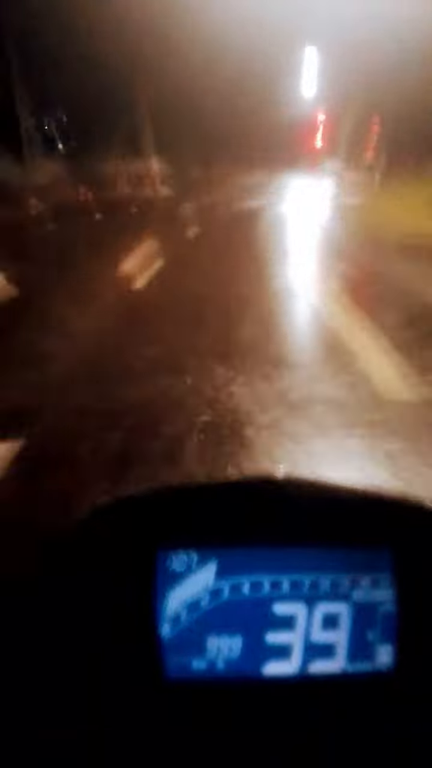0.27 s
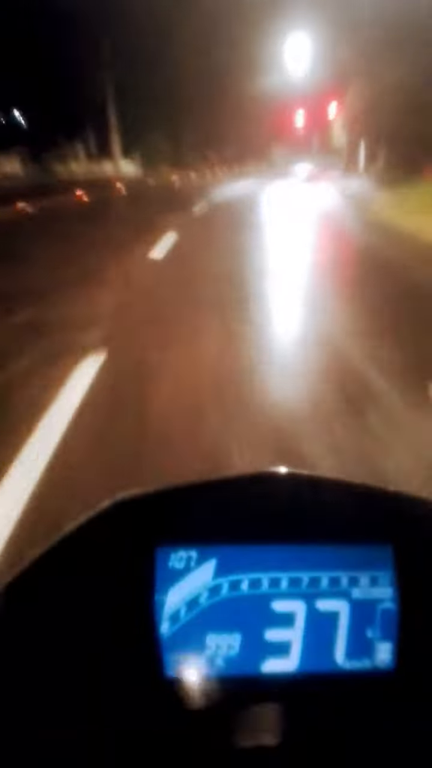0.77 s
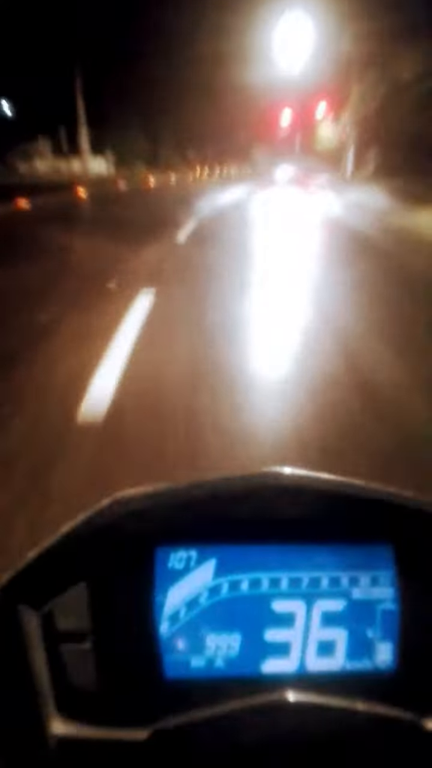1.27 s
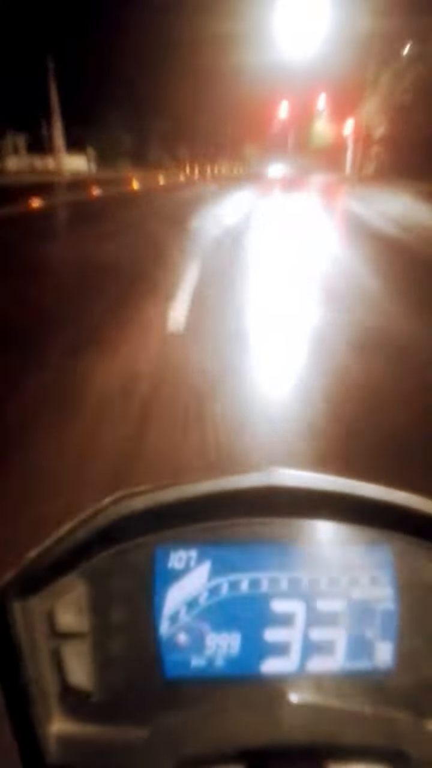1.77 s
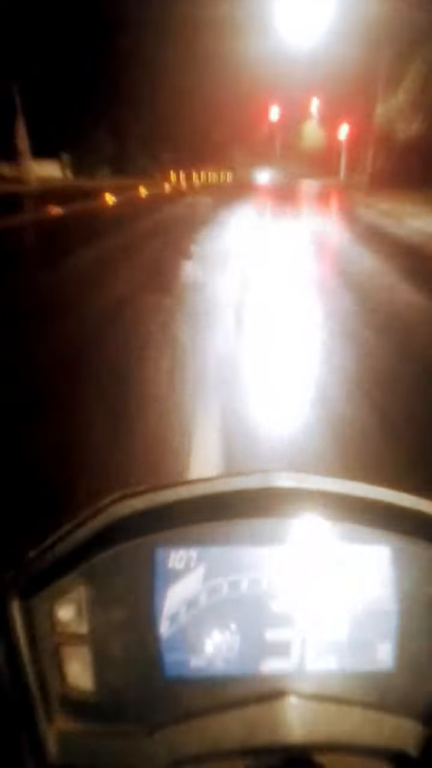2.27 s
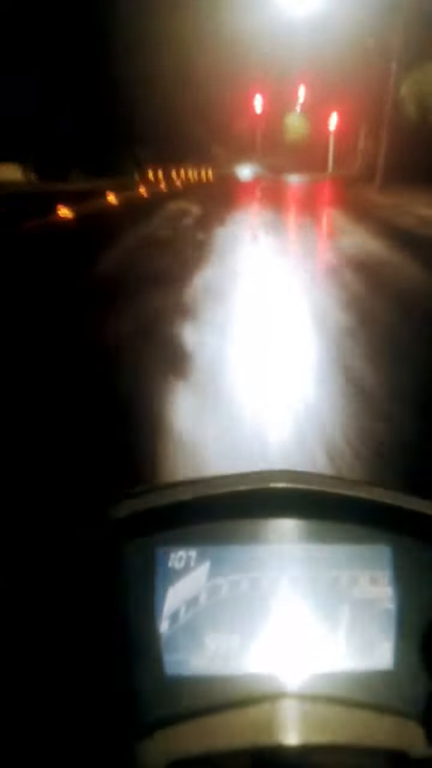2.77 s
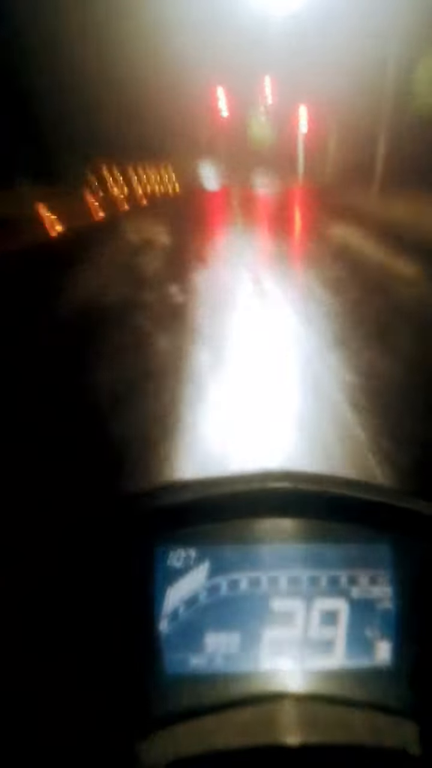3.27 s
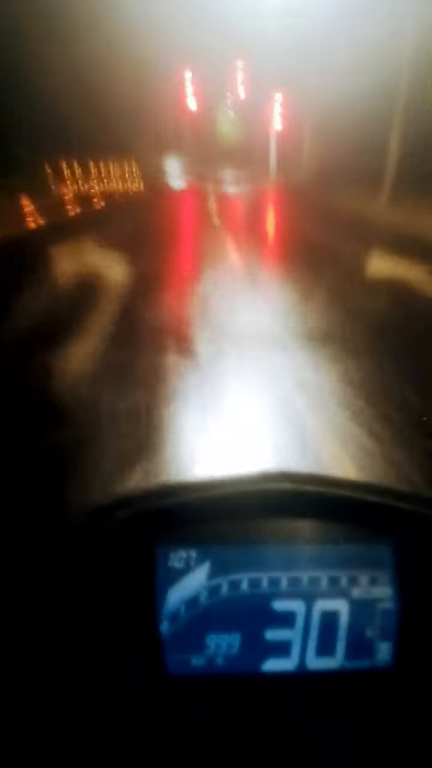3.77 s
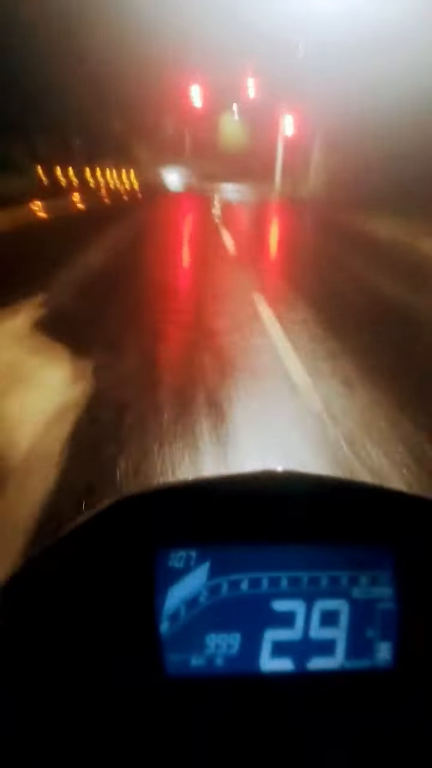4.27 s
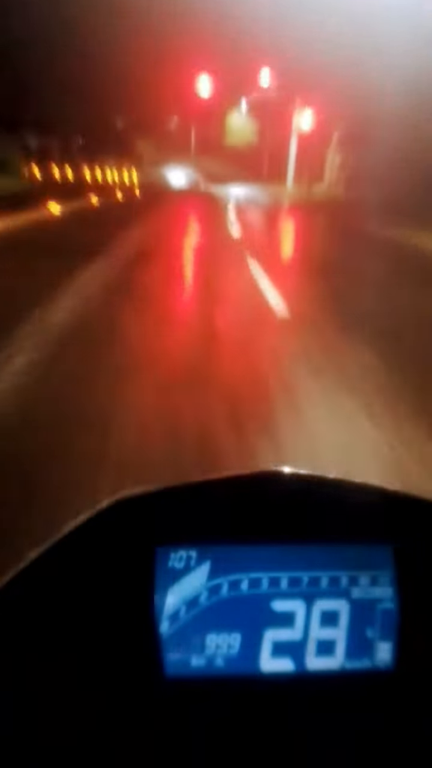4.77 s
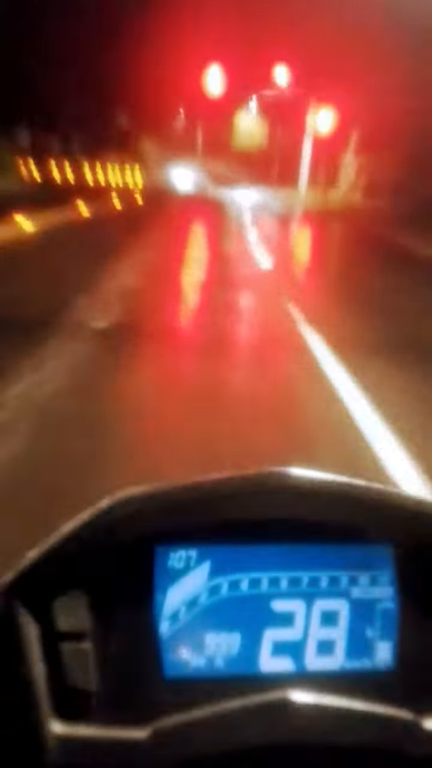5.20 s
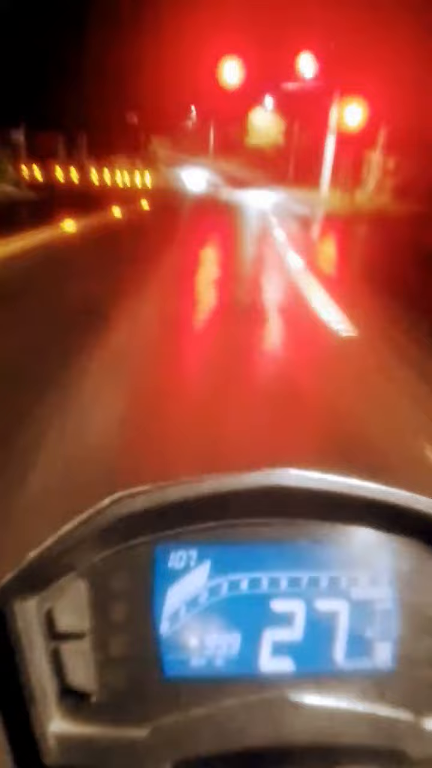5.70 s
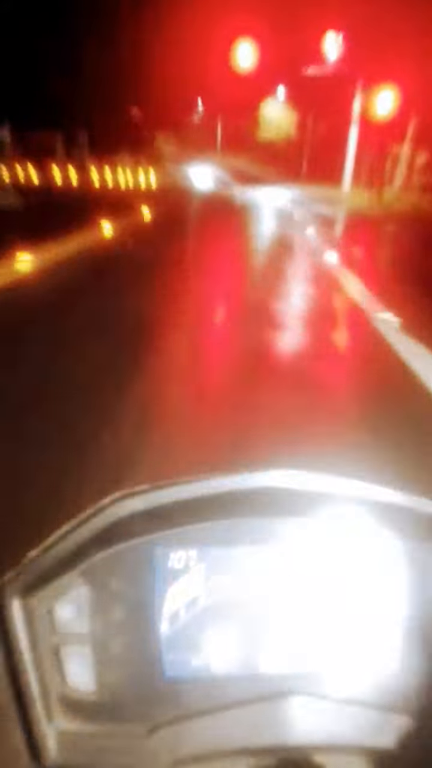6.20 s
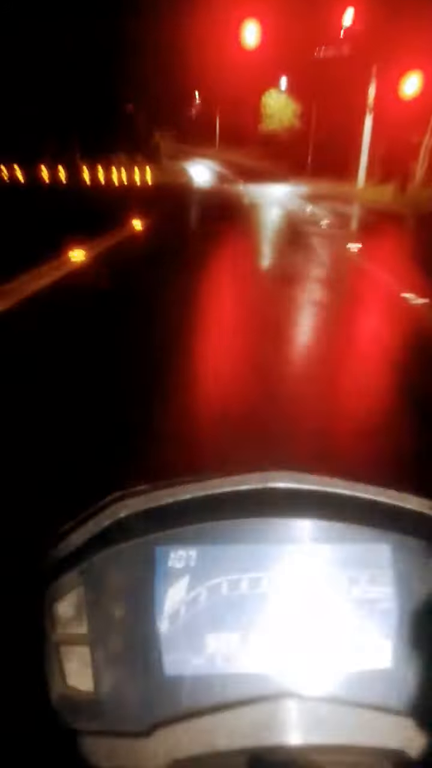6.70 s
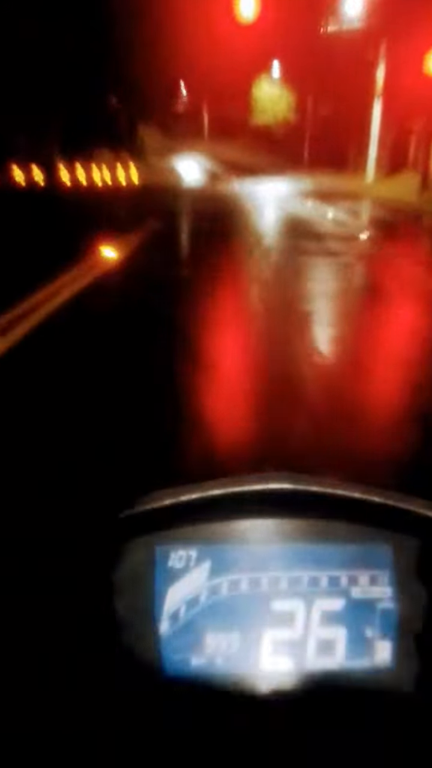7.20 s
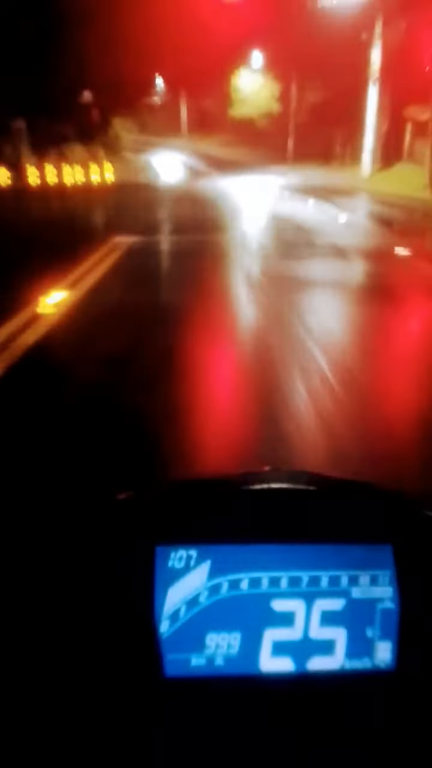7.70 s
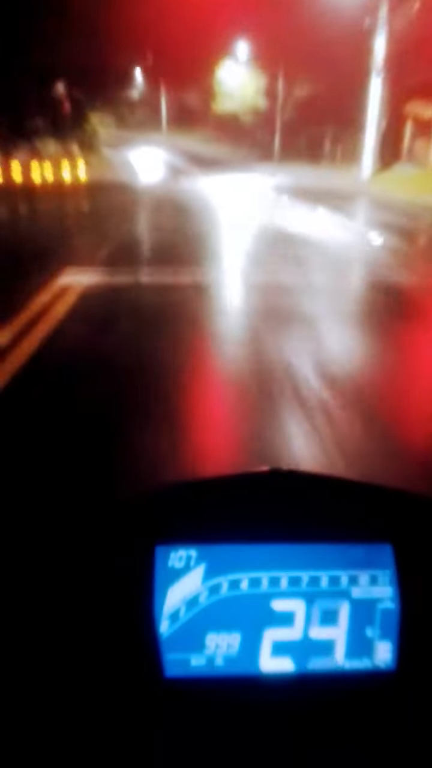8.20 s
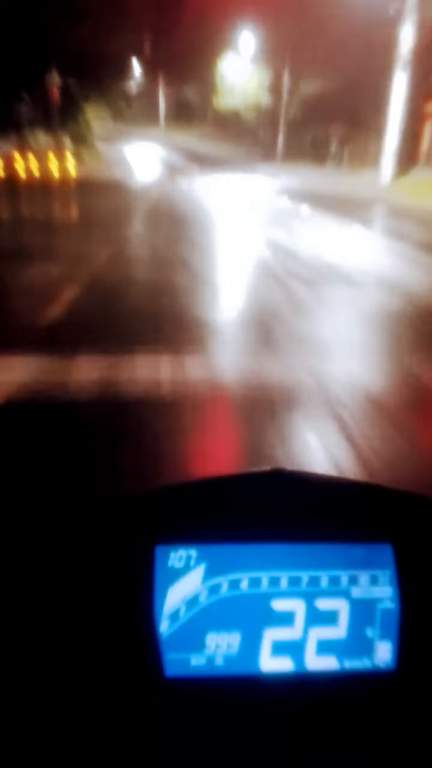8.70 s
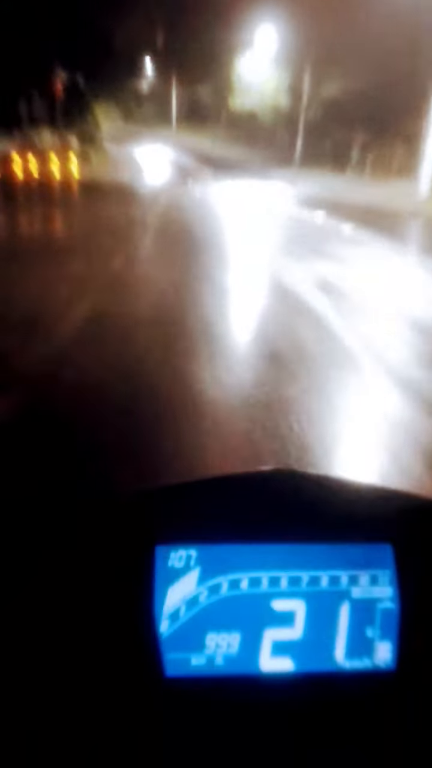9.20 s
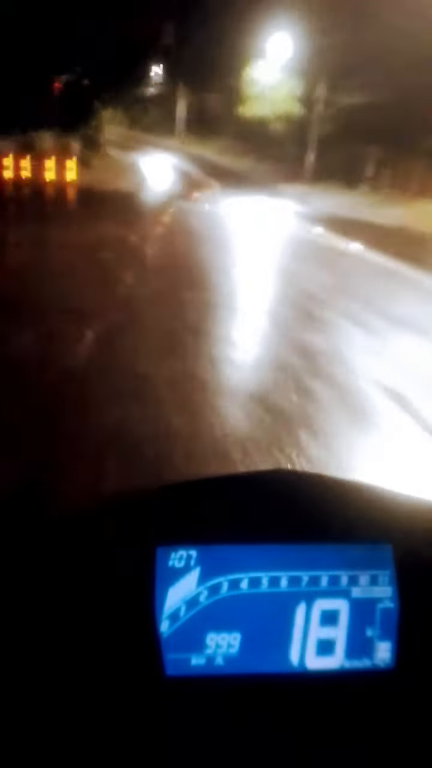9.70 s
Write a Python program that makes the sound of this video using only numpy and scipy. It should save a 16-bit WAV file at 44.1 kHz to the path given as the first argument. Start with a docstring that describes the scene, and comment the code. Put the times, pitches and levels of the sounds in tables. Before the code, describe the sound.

A small motorcycle coasts on a wet road, heard from on board. A fluttering roar of wind and tyres continues throughout, with irregular hollow knocks from bumps and thin ticking and buzzing from loose panels. Beneath it a low, wavering engine drone and a gear whine gradually fall in pitch. A brief hum and a faint rasp colour the first second or so, with a cluster of clicks at about 0.4 seconds. Around 2.4 seconds the engine dips for a downshift and returns higher by 2.7. It sinks again until about 6.4 seconds, when the clutch is pulled and engine and rattle drop away for half a second, then return at a higher pitch. The whine is strongest from 8 to 9.8 seconds, with a short break near 8.8. After 9.4 seconds the engine recedes and the rattles thin out, while the road noise carries on.

```python
"""On a wet road at night, a small motorcycle coasts down through two gear changes.
It is heard from on board, through a housing that rocks on its mount and modulates the sound.
Wind and road noise are filtered by the housing's resonances; bumps knock it, loose parts tick,
and its panels buzz in forced vibration. Meshing gears whine, and the crankshaft sounds its first
two harmonics. Engine, upper whine and roar sink whenever the clutch is pulled."""
import sys
import numpy as np
from scipy import signal
from scipy.fft import rfft, irfft, next_fast_len
from scipy.io import wavfile
from scipy.ndimage import uniform_filter1d

SR = 44100
rng = np.random.default_rng(int(sys.argv[2]) if len(sys.argv) > 2 else 0)


def wrap_up_sound(samples):
    """Save the sound to the file named by the first command line argument, as 16-bit audio."""
    columns = np.atleast_2d(samples).T
    # keep every value between -1 and 1, then stretch to whole-number steps
    tamed = np.clip(columns, -1, 1)
    steps = np.round(tamed * 32767).astype(np.int16)
    wavfile.write(sys.argv[1], SR, steps)


N = 438354
T = np.arange(N) / SR


def amp(db):
    """Amplitude ratio of a level in decibels."""
    return 10 ** (np.asarray(db) / 20)


def unit(x):
    """Normalisation to an rms of 1."""
    return x / np.sqrt(np.mean(x ** 2) + 1e-20)


def curves(rows):
    """Linear interpolation of each column of a table over time."""
    times, *columns = np.transpose(rows)
    return [np.interp(T, times, column) for column in columns]


def add(mix, start_s, sound):
    """Superposition of a short sound on the mix."""
    part = mix[round(start_s * SR):][:len(sound)]
    part += sound[:len(part)]


def wander(grain_s):
    """Random fluctuation: white noise smoothed by two moving averages."""
    size = max(round(grain_s * SR), 1)
    return unit(uniform_filter1d(uniform_filter1d(rng.standard_normal(N), size), size))


def ring(t, hz, rise_s):
    """Damped oscillation whose envelope peaks at rise_s."""
    return t / rise_s * np.exp(1 - t / rise_s) * np.sin(2 * np.pi * hz * t)


def resonate(x, hz, width_hz):
    """Resonance with steep skirts: a double pole at hz."""
    carrier = np.exp(2j * np.pi * np.cumsum(hz * np.ones(N)) / SR)
    r = np.exp(-np.pi * width_hz / SR)
    return 2 * (carrier * signal.lfilter([(1 - r) ** 2], [1, -2 * r, r * r], x / carrier)).real


def coloured(x, spectrum):
    """Minimum-phase filtering, so that blows ring only after they land; rms 1."""
    size = 2 * next_fast_len(N // 2 + 4096)
    hz, db = np.transpose(spectrum)
    bins_hz = np.fft.rfftfreq(size, 1 / SR)
    gain_db = np.interp(np.log(bins_hz + 1), np.log(hz + 1), db, left=-80, right=-80)
    cepstrum = irfft(gain_db * np.log(10) / 20, size)
    cepstrum[1:size // 2] *= 2  # fold onto positive time
    cepstrum[size // 2 + 1:] = 0
    return unit(irfft(rfft(x, size) * np.exp(rfft(cepstrum)), size)[:N])


# Strokes of the clutch lever: pull_s, release_s, depth_fraction
CLUTCH_STROKES = [(2.333, 2.547, 0.6), (6.398, 6.761, 0.95), (9.357, 10.2, 0.5)]
def clutch():
    """Decoupling of the drive, from 0 (engaged) to 1 (fully pulled)."""
    fade_s, grip_s = .22, .15
    return sum(depth * np.clip(np.minimum((T - pull) / fade_s, (release - T) / grip_s + 1), 0, 1)
               for pull, release, depth in CLUTCH_STROKES)


# Sway of the housing on its mount: time_s, rate_hz, relative_depth
MOUNT_SWAY = [(0.0, 19.23, 0.91), (0.28, 15.5, 0.55), (0.57, 16.68, 1.24), (0.85, 17.9, 0.98),
              (1.14, 16.97, 1.59), (1.42, 16.28, 0.83), (1.7, 17.53, 1.16), (1.99, 13.5, 0.9),
              (2.27, 17.74, 0.87), (2.56, 16.48, 0.73), (2.84, 17.36, 1.17), (3.12, 14.62, 1.32),
              (3.41, 18.73, 1.27), (3.69, 16.02, 1.47), (3.98, 16.81, 1.31), (4.26, 17.25, 1.09),
              (4.54, 19.36, 1.3), (4.83, 18.04, 0.89), (5.11, 13.53, 0.94), (5.4, 18.06, 1.43),
              (5.68, 18.55, 0.99), (5.96, 17.1, 1.33), (6.25, 17.67, 1.23), (6.53, 18.5, 0.81),
              (6.82, 16.87, 0.91), (7.1, 17.74, 1.31), (7.38, 16.37, 1.16), (7.67, 16.3, 0.47),
              (7.95, 18.98, 0.94), (8.24, 16.77, 0.94), (8.52, 16.94, 0.37), (8.8, 16.16, 0.94),
              (9.09, 17.12, 0.95), (9.37, 17.24, 0.55), (9.66, 15.25, 0.37), (9.94, 26.64, 0.32)]
def rocking():
    """Low-frequency oscillation of the mount, wandering in depth."""
    rate_hz, depth = curves(MOUNT_SWAY)
    cycles = np.cumsum(rate_hz) / SR - .082
    return (depth + .33 * wander(.19)) * np.cos(2 * np.pi * cycles)


def shaken(motion, rock_db, crank_db, jolt_db, flutter_db, grain_s):
    """Amplitude modulation of white noise by mount, crank, road jolts and chance."""
    rock, crank, jolts = motion
    noise = rng.standard_normal(N)
    level_db = rock_db * rock + crank_db * crank + jolt_db * jolts + flutter_db * wander(grain_s)
    return unit(noise * amp(level_db))


def pelting(motion):
    """Poisson impacts, likelier at the top of each rock and each crank turn."""
    rock, crank, _ = motion
    lands = rng.random(N) < 120 * np.exp(.8 * rock + .6 * crank) / SR
    return unit(lands * rng.choice([-1., 1.], N) * amp(4 * np.minimum(rng.exponential(1, N), 3)))


# Spectrum of the faint hiss: frequency_hz, relative_db
HISS_SPECTRUM = [(2500, 11), (3500, 15.5), (4500, 1.5), (7000, 5.5), (10500, -15.5), (13000, -0.5),
                 (15000, 0), (15500, 2), (15800, 2)]
def hiss():
    """Broadband treble noise that follows the buzz and spatters once."""
    spatter_s, length_s, spatter_db = .25, .04, 12
    spatter = np.clip(1.5 - abs((T - spatter_s) / length_s * 3 - 1.5), 0, 1)
    level_db = -88 + .31 * (curves(PANEL_LEVELS)[0] + 89) + spatter_db * spatter
    return amp(level_db) * coloured(rng.standard_normal(N) * amp(3.2 * wander(.004)), HISS_SPECTRUM)


# A ringing cover: time_s, level_db
COVER_LEVELS = [(0.0, -64), (0.49, -58.5), (0.91, -69), (1.07, -58.5), (1.1, -68), (2.15, -68), (2.28, -65),
                (2.51, -72), (2.67, -65), (3.22, -73), (3.28, -67.5), (6.4, -68.5), (6.73, -84),
                (6.92, -68), (9.15, -67.5), (9.9, -84.5)]
# Four buzzing panels, lowest first: time_s, first_db, second_db, third_db, fourth_db
PANEL_LEVELS = [(0, -70, -75, -73, -88), (.35, -70, -78, -81, -91), (.375, -64, -63, -66, -77),
                (.43, -67, -66, -70, -78), (.46, -68, -71, -73, -79), (.72, -71, -71, -80, -83),
                (.82, -74, -79, -82, -89), (1.3, -69.5, -80, -83.5, -93), (1.57, -70.5, -79, -87, -92),
                (1.66, -66.5, -75, -76.5, -88), (1.95, -75, -84, -86, -91), (2.3, -72, -73.5, -81, -89.5),
                (2.42, -74.5, -82, -80, -95), (2.53, -82, -92, -89, -99), (2.64, -68, -78, -86, -95),
                (2.8, -72, -79.5, -79, -94), (3, -75, -88, -90, -97), (3.2, -71, -80, -82.5, -91),
                (3.47, -70, -74, -77, -84.5), (3.75, -70, -76, -78, -88), (3.95, -68, -75, -77, -81),
                (4.2, -72, -81, -82, -90.5), (4.4, -71, -78, -79.5, -92.5), (4.75, -71, -81, -79, -86),
                (4.9, -73, -81.5, -84, -94.5), (5.42, -71, -75, -81, -92), (5.94, -75, -81, -79, -92),
                (6.2, -73, -81, -82, -90), (6.42, -73.5, -82.5, -87, -94), (6.56, -95, -103, -104, -104),
                (6.78, -91, -103, -102, -104), (6.87, -85, -92, -92, -100), (6.93, -70, -78.5, -77, -84),
                (7.25, -71.5, -80, -79, -91), (7.5, -74.5, -80, -83.5, -98),
                (7.86, -74.5, -77, -81.5, -96.5), (8.38, -77.5, -86.5, -86.5, -100),
                (8.6, -73, -85, -88, -95), (8.7, -73.5, -80, -80, -88), (8.95, -72, -80, -77, -84),
                (9.1, -73.5, -86, -89, -100), (9.38, -77, -85, -95, -102), (9.52, -86, -100, -102, -106),
                (9.94, -92, -102, -104, -106)]
# Modes, one list for each panel: pitch_hz, width_hz, relative_db
PANEL_MODES = [
    [(3480, 200, 0)],
    [(3950, 170, 0)],
    [(5130, 440, -0.5), (5230, 400, -5.5)],
    [(6800, 430, 0.5), (7100, 1200, -3.5), (8140, 900, -4.5)],
]
def buzz(motion, impacts):
    """Forced vibration: a shaken cover and panels resonate in narrow treble bands."""
    drive = shaken(motion, rock_db=.47, crank_db=1.1, jolt_db=1.3, flutter_db=1.9, grain_s=.0026)
    drive += .39 * impacts
    cover_hz, width_hz = 2629, 340
    cover = resonate(resonate(drive, cover_hz, width_hz), cover_hz, width_hz)
    out = amp(curves(COVER_LEVELS)[0]) * unit(cover)
    for level_db, modes in zip(curves(PANEL_LEVELS), PANEL_MODES):
        panel = sum(amp(db) * resonate(drive, hz, width) / np.sqrt(width) for hz, width, db in modes)
        out += amp(level_db) * unit(panel)
    return out


def snap(noise, decay_s=.00093):
    """Contact transient: band-limited noise with an exponential decay."""
    band = signal.butter(2, (2800, 7800), "band", fs=SR, output="sos")
    return signal.sosfilt(band, noise) * np.exp(-T[:len(noise)] / decay_s)


def small_ticks(rock):
    """Poisson rattle: tiny ticks whose rate follows the rocking and whose level follows the buzz."""
    t = T[:500]
    tick = (ring(t, 3800, .00045) + .68 * ring(t, 2500, .00027) + .47 * ring(t, 5100, .0003)
            + .15 * ring(t, 6900, .0001) + .351 * snap(rng.standard_normal(len(t))))
    lands = rng.random(N) < 60 * np.exp(.4 * rock) / SR
    level_db = curves(PANEL_LEVELS)[0] + 3.5 + 3.8 * np.minimum(rng.exponential(1, N), 3)
    return signal.oaconvolve(lands * amp(level_db), tick)[:N]


# Dry clicks, densest around the hard bump: start_s, relative_db
DRY_CLICKS = [(0.1191, -58), (0.3536, -62), (0.375, -53), (0.3824, -51), (0.3934, -58), (0.4024, -54),
              (0.405, -56), (0.4104, -60), (0.4164, -57), (0.4214, -52), (0.4264, -62), (0.4304, -60),
              (0.4674, -59), (0.4804, -61), (0.5302, -60), (0.5477, -58), (0.6509, -59), (0.8804, -62),
              (0.9702, -61), (1.0104, -58), (1.2484, -61), (1.5524, -64), (1.5824, -68), (1.6596, -60),
              (1.6871, -62), (1.7245, -60), (2.2513, -69), (2.3675, -60), (2.3944, -67), (2.5476, -66),
              (2.7124, -64), (2.8928, -65.5), (2.9354, -67), (2.9896, -69), (3.3273, -61), (3.713, -60),
              (3.8342, -64), (3.904, -55), (3.9564, -62), (3.9923, -58), (4.1475, -60), (4.5865, -60),
              (4.9217, -60), (5.1267, -62), (5.2315, -65), (5.5438, -62), (5.7558, -63), (5.911, -60),
              (6.0851, -58.5), (6.2158, -65), (6.3969, -61), (6.9232, -65), (7.0703, -66), (7.203, -63),
              (7.891, -64), (8.8238, -59), (8.9346, -60), (9.0608, -63)]
def chatter():
    """Heavily damped impacts: the modes die too soon to be heard as a ring."""
    out, t = np.zeros(N), T[:500]
    click = .6 * ring(t, 3700, .00018) + 1.3 * ring(t, 2200, .00022) + .3 * ring(t, 6000, .00008)
    for start_s, db in DRY_CLICKS:
        add(out, start_s, amp(db) * (click + 1.9 * snap(rng.standard_normal(len(t)), decay_s=.00092)))
    return out


# Strikes of loose parts: start_s, ring_db, pitch_hz, body_db, snap_db (levels are relative)
LOOSE_STRIKES = [(0.0633, -50, 3430, -54, -67), (0.1017, -50, 3770, -44, -69),
                 (0.1725, -47, 3760, -42, -69), (0.209, -41, 3990, -48, -69), (0.2274, -50, 3710, -46, -70),
                 (0.379, -43, 3360, -36, -64), (0.4544, -45, 3350, -39, -66), (0.508, -37, 4040, -42, -60),
                 (0.5626, -48, 3820, -53, -68), (0.605, -52, 4080, -44, -65), (0.628, -43, 3910, -42, -65),
                 (0.6684, -53, 3460, -46, -63), (0.6846, -45.5, 3830, -48, -65),
                 (0.7382, -49, 3830, -49, -68), (0.7716, -52, 3440, -47, -67.5),
                 (0.9028, -51, 3860, -52, -67), (1.0036, -49, 3500, -40, -69), (1.064, -52, 3530, -47, -73),
                 (1.1189, -54, 3400, -52, -80), (1.1784, -46, 3430, -39, -70),
                 (1.2027, -57, 3460, -51, -74), (1.235, -51, 3830, -41, -69),
                 (1.344, -51, 3380, -36.5, -63), (1.524, -47, 3997, -51, -70),
                 (1.6262, -49, 3460, -50, -68), (2.063, -50, 3582, -45, -72), (2.2877, -52, 3450, -51, -72),
                 (2.319, -46.5, 3930, -54, -69), (2.6678, -56, 3420, -51, -72),
                 (2.6978, -48.5, 3540, -51, -68), (3.117, -42, 3810, -53, -66),
                 (3.237, -49, 3840, -51, -75), (3.269, -46, 3440, -46, -69), (3.3935, -50, 3980, -48, -69),
                 (3.4366, -48, 3280, -40, -66), (3.4465, -42, 4000, -45, -62),
                 (3.4786, -46, 3430, -35, -65), (3.5127, -40.5, 3980, -41, -67),
                 (3.558, -48, 3320, -48, -70), (3.614, -48, 3344, -54, -68), (3.679, -46, 3554, -40, -68),
                 (3.814, -47, 3600, -52, -69), (3.9323, -37.5, 3910, -37.5, -62),
                 (4.164, -51, 3870, -62, -72), (4.269, -49, 3716, -40, -67), (4.3316, -50, 4010, -48, -66),
                 (4.4194, -63, 3530, -47, -73), (4.4847, -50, 3510, -40, -69.5),
                 (4.5306, -53, 3346, -47, -68), (5.1951, -59, 3370, -50, -72),
                 (5.2085, -45, 3950, -54, -71), (5.4008, -53, 3400, -59, -78), (5.46, -54, 3350, -45, -75),
                 (5.6855, -58, 3360, -50, -70), (5.7069, -50, 3570, -44, -66),
                 (5.7261, -53, 3848, -53.5, -72), (5.8733, -58, 3340, -49, -69),
                 (5.8882, -45, 3920, -51, -66), (6.2659, -54, 3485, -48, -74), (6.892, -54, 3400, -51, -71),
                 (8.639, -52, 3521, -46, -68), (9.1445, -42, 3902, -60, -74)]
def ticks():
    """Impact and rebound: a loose part touches lightly, strikes, then rings in free vibration."""
    out, t = np.zeros(N), T[:500]
    bounce_s, ring_delay_s, roughness = .0033, .001, .32
    for start_s, ring_db, hz, body_db, snap_db in LOOSE_STRIKES:
        noise = rng.standard_normal(len(t))
        touch = amp(body_db) * ring(t, 2100, .00048) + 1.3 * amp(snap_db) * snap(noise)
        rise_s = .0006 * np.exp(.28 * noise[0])  # each ring has its own length
        modes = ring(t, hz, rise_s) + amp(-8) * ring(t, 5200, rise_s)
        grit = unit(uniform_filter1d(uniform_filter1d(noise, 40), 40))
        add(out, start_s - bounce_s, amp(-6.5) * touch)
        add(out, start_s, touch)
        add(out, start_s + ring_delay_s, amp(ring_db) * modes * (1 - roughness + roughness * grit))
    return out


# A hum in the first second: time_s, pitch_hz, level_db
HUM_TONE = [(0, 204.9, -25), (.3, 205, -40.5), (.6, 200.9, -29), (.75, 197, -44), (.9, 200, -53.5)]
def hum():
    """A pure tone that drifts in pitch and fades unevenly."""
    hz, db = curves(HUM_TONE)
    sounding = T < HUM_TONE[-1][0]
    return np.sqrt(2) * amp(db) * sounding * np.sin(2 * np.pi * np.cumsum(hz) / SR)


# Bumps that knock the housing: start_s, level_db, pitch_hz, edge_db
BUMPS = [(0.014, -17, 315, -33), (0.105, -15.5, 370, -45), (0.168, -12.5, 221, -19.5),
         (0.202, -24, 262, -19), (0.278, -15, 269, -31), (0.309, -15.5, 374, -27), (0.376, -16, 354, -32),
         (0.401, -10.5, 278, -24), (0.425, -16, 369, -28), (0.453, -16, 322, -29), (0.54, -17.5, 300, -30),
         (0.598, -19, 339, -31), (0.65, -16.5, 265, -24), (0.811, -27.5, 398, -34), (0.887, -15, 253, -40),
         (0.965, -16, 393, -27), (1.053, -16, 262, -33), (1.114, -26, 256, -28), (1.158, -19, 288, -37),
         (1.229, -18, 226, -38), (1.285, -23, 251.7, -26), (1.332, -16.5, 255, -21), (1.456, -32, 390, -23),
         (1.832, -24.5, 264, -34), (1.906, -22.5, 272, -26), (2.03, -22, 232, -32), (2.055, -16, 287, -38),
         (2.091, -17.5, 280, -36), (2.182, -14.5, 282, -22), (2.214, -15.5, 309, -31),
         (2.274, -20.5, 260, -24), (2.373, -16.5, 237, -16.5), (2.54, -13.5, 264.1, -36),
         (2.6, -12.5, 264, -18.5), (2.572, -19, 270, -34), (2.62, -15, 280, -21), (2.65, -21, 300, -32),
         (2.75, -22.5, 249, -35), (2.797, -19, 240, -24), (2.887, -23, 264, -37), (2.992, -19, 256, -30),
         (3.066, -23, 385, -32.5), (3.26, -22, 260, -32), (2.972, -26, 244, -27), (3.202, -25.5, 394, -27),
         (3.436, -20.5, 312, -33), (3.487, -17, 233.5, -19.5), (3.506, -14.5, 295, -24),
         (3.532, -20, 241, -27), (3.558, -15.5, 299.8, -32), (3.659, -13.5, 316, -26),
         (3.712, -29, 333, -37), (4.003, -23, 257, -33), (4.049, -19, 322, -22), (4.295, -18, 270, -30),
         (4.315, -17.5, 292, -35), (4.585, -18.5, 377, -32), (4.712, -19, 236, -28),
         (4.757, -19, 266.4, -25), (4.835, -19, 296, -42), (4.948, -16.5, 363, -20), (4.977, -15, 286, -31),
         (5.011, -18.5, 318, -31), (5.104, -17, 269, -29), (5.122, -15, 250, -36.5),
         (5.137, -17.5, 352, -24), (5.193, -18.5, 290, -29), (5.298, -26.5, 272, -32),
         (5.455, -13.5, 292, -22), (5.535, -26, 312, -32), (5.581, -24, 304, -32), (5.731, -18.5, 328, -31),
         (5.863, -18, 283.1, -36), (5.911, -19, 388, -38), (6.076, -21, 266, -32), (6.138, -29, 293, -38),
         (6.241, -17.5, 306, -25.5), (6.319, -22, 310, -26), (6.603, -22, 331, -34),
         (6.694, -17.5, 288, -37), (6.871, -19.5, 265, -17), (6.921, -24.5, 269, -23), (7.0, -23, 293, -28),
         (7.104, -28, 260, -29), (7.162, -31, 380, -25), (7.253, -20, 266, -23.5), (7.283, -23, 378, -36),
         (7.382, -18, 269, -27), (7.478, -20.5, 306, -31), (7.826, -18.5, 256, -36), (7.937, -32, 364, -28),
         (8.128, -19.5, 287, -29), (8.323, -19.5, 241, -37), (8.559, -19, 253.4, -24),
         (8.634, -26, 299, -23), (9.277, -33, 317.5, -23), (9.599, -28, 494, -29)]
def knocks():
    """Impulse response of the housing: a short blow, a bright edge and a low push."""
    out, t = np.zeros(N), T[:2600]
    edge_hz, push_hz = 625, 88
    push = amp(-40) * ring(t, push_hz, .0039)
    for start_s, db, hz, edge_db in BUMPS:
        add(out, start_s, amp(db) * ring(t, hz, .0031) + amp(edge_db) * ring(t, edge_hz, .0014) + push)
    return out


def dip_at_bumps(shape_db, lead_s):
    """Gain modulation: the level dips briefly, starting lead_s before each bump."""
    db = np.zeros(N)
    for start_s, *_ in BUMPS:
        add(db, start_s - lead_s, shape_db)
    return amp(db)


# Three ranges of the roar: time_s, middle_db, upper_db, shudder_db
ROAR_LEVELS = [(0, -24, -53, -38), (.4, -26, -57, -36), (.85, -26.5, -60, -43.5), (1.5, -27, -57.5, -37),
               (2.3, -28, -55, -41.5), (2.65, -26, -52.5, -42.5), (3.0, -28.5, -56.5, -41.5),
               (3.5, -28, -55, -40.5), (4.7, -28.5, -55.5, -40), (5.9, -28, -55.5, -41),
               (6.45, -29.5, -55.5, -43), (6.85, -24.5, -53.5, -35.5), (7.0, -28.5, -54.5, -39.5),
               (8.5, -29.5, -56.5, -47), (8.85, -30, -57, -38.5), (9.35, -32, -60.5, -42.5),
               (9.94, -30.5, -53, -48)]
# Response of the housing in the low, middle and upper range: frequency_hz, relative_db
SHUDDER_SPECTRUM = [(15, -48), (25, -16), (32, -22.5), (48, -16), (70, 0), (129, -3), (162, -16),
                    (170, -12.5), (220, -43.5), (370, -120)]
MIDDLE_SPECTRUM = [(94, -49.5), (160, -12.5), (166, -11.5), (197, -6), (222, 1), (335, 0), (389, -2),
                   (483, -5.5), (556, -6.5), (690, -8.5), (786, -14.5), (863, -14), (939, -21.5),
                   (1120, -16), (1500, -33.5), (1950, -76.5), (3300, -120)]
UPPER_SPECTRUM = [(1250, 2.5), (1400, 4), (1550, -25), (1680, 1), (1860, -2.5), (2070, 1), (2250, -4),
                  (2400, -9.5), (2500, -5), (2640, -8), (2780, -15.5), (2880, -27.5), (3000, -32.5),
                  (3300, -20), (3700, -34), (4200, -54.5)]
def roar(motion, impacts, blows):
    """Source and filter: wind, wet road and engine blows excite the resonances of the housing."""
    middle_db, upper_db, shudder_db = curves(ROAR_LEVELS)
    rock, pulled = motion[0], clutch()
    gusts = shaken(motion, rock_db=3.6, crank_db=0, jolt_db=1.8, flutter_db=1.2, grain_s=.044)
    shudder = coloured(gusts + .2 * impacts, SHUDDER_SPECTRUM)
    rush = shaken(motion, rock_db=.38, crank_db=1, jolt_db=.84, flutter_db=1, grain_s=.0017)
    middle = coloured(rush + .3 * impacts + .4 * blows, MIDDLE_SPECTRUM)
    # the lowest ring of the housing swells most with each rock
    middle = unit(middle + .33 * rock * resonate(middle, hz=290, width_hz=320))
    flutter = shaken(motion, rock_db=1, crank_db=.82, jolt_db=.59, flutter_db=2.3, grain_s=.0041)
    upper = coloured(flutter + .22 * impacts + .54 * blows, UPPER_SPECTRUM)
    out = (amp(shudder_db - 12.5 * pulled) * shudder + amp(middle_db - 3 * pulled) * middle
           + amp(upper_db - 14.5 * pulled) * upper)
    age = T[:4000] / .0017
    return out * dip_at_bumps(-.5 * age * np.exp(1 - age), lead_s=0)


def mesh_tone(hz, waver_db):
    """Tooth-meshing tone with random frequency and amplitude modulation."""
    cycles = np.cumsum(hz * (1 + .027 * wander(.006))) / SR
    return np.sqrt(2) * np.sin(2 * np.pi * cycles) * amp(waver_db * wander(.014))


# Whine of two gear meshes: time_s, lower_db, upper_db, upper_pitch_hz (levels are relative)
GEAR_WHINE = [(0, -55, -52, 1293), (1.2, -61.5, -46.5, 1256), (1.7, -45, -50, 1205),
              (2.45, -56, -56.5, 1092), (2.66, -51.5, -49.5, 1253), (3.2, -42.5, -52.5, 1133),
              (4.5, -50.5, -52.5, 1106), (5.55, -45, -50.5, 1090), (6.2, -41.5, -50.5, 1065),
              (6.33, -57, -55, 1050), (6.6, -61.5, -58, 1061), (6.95, -47.5, -48.5, 1110),
              (7.5, -47.5, -50, 1099), (7.75, -44.5, -48, 1084), (8.0, -36.5, -49, 1055),
              (8.55, -36.5, -48, 1011), (8.68, -40.5, -61, 996), (8.78, -54, -65, 1080),
              (9.0, -48, -54, 1075), (9.1, -41.5, -59.5, 1070), (9.25, -36, -61, 1058),
              (9.75, -37, -48, 1038), (9.94, -59, -52, 1050)]
def gears(crank_hz, turns):
    """Cyclic loading modulates both meshes each turn, and the upper at each firing, every second turn."""
    lower_db, upper_db, upper_hz = curves(GEAR_WHINE)
    turn_load = 1 + .4 * np.cos(2 * np.pi * turns)
    firing_load = 1 + .9 * np.cos(np.pi * turns)
    lower = amp(lower_db) * mesh_tone(10.9 * crank_hz, waver_db=3)
    upper = amp(upper_db - 18 * clutch()) * mesh_tone(upper_hz, waver_db=2.2)
    return turn_load * (lower + firing_load * upper)


# A rasp, strongest at the higher speeds: time_s, level_db
RASP_LEVELS = [(0, -51), (.6, -54), (1.3, -53), (1.6, -81.5), (3.2, -68), (3.5, -66), (4, -69.5),
               (9.94, -77.5)]
def rasp():
    """Narrow-band noise from one randomly excited resonance."""
    return amp(curves(RASP_LEVELS)[0]) * unit(resonate(rng.standard_normal(N), hz=1470, width_hz=530))


def putter(turns, rock):
    """Periodic impulse excitation: an uneven blow on the frame each turn, harder atop each rock."""
    new_turn = np.diff(np.floor(turns + .008 * wander(.01)), prepend=0) > 0
    strength = amp(2 * rock + 4 * np.clip(rng.standard_normal(N), -2, 1.5) - 18 * clutch())
    decay = np.exp(-T[:400] / .0018)
    return unit(signal.oaconvolve(new_turn * strength, decay)[:N] * rng.standard_normal(N))


# Crankshaft, sagging at each gear change: time_s, rotation_hz, first_db, second_db (levels are relative)
CRANKSHAFT = [(0, 74.6, -47, -50), (.8, 75.4, -43.5, -58.5), (1.2, 68.3, -42.5, -55),
              (2.05, 67.2, -46, -56), (2.3, 66.4, -48, -57.5), (2.5, 48.4, -45.5, -54),
              (2.68, 72.4, -39, -44.5), (2.9, 72, -49.5, -53.5), (3.2, 65.6, -40.5, -50.5),
              (4.5, 65, -42.5, -55.5), (5.3, 63.2, -42, -53.5), (6.2, 60.3, -44.5, -48),
              (6.45, 52, -42.5, -50.5), (6.75, 54, -43, -52), (6.92, 66, -42.5, -54),
              (7.15, 66.5, -45.5, -57), (7.55, 60.9, -45, -51), (7.9, 60.4, -43.5, -48.5),
              (8.35, 57.6, -44, -46), (8.68, 54.6, -41, -44), (9.0, 49.6, -42.5, -58.5),
              (9.94, 44.8, -46, -54.5)]
def engine(turns, rock, jolts):
    """Two harmonics of the crank rotation; amplitude modulation by the mount adds sidebands."""
    _, first_db, second_db = curves(CRANKSHAFT)
    orders = amp(first_db) * np.sin(2 * np.pi * turns) + amp(second_db) * np.sin(4 * np.pi * turns)
    orders *= amp(5.5 - 19 * clutch() + .52 * wander(.52) + .53 * jolts)
    low_cut = signal.butter(2, 62, "high", fs=SR, output="sos")  # favours the upper sidebands
    return signal.sosfilt(low_cut, orders * (1 + .9 * rock))


def scene():
    """Superposition of the sources, tied together by the crank and the rocking mount."""
    crank_hz = curves(CRANKSHAFT)[0]
    turns = np.cumsum(crank_hz) / SR
    rock, jolts = rocking(), wander(.014)
    motion = rock, np.cos(2 * np.pi * turns), jolts
    mix = engine(turns, rock, jolts) + gears(crank_hz, turns) + rasp() + hum()
    mix += knocks() + ticks() + small_ticks(rock) + chatter()
    impacts = pelting(motion)
    mix += roar(motion, impacts, putter(turns, rock)) + buzz(motion, impacts)
    hollow_db = -1.5 * np.hanning(round(.048 * SR))
    return (mix * dip_at_bumps(hollow_db, lead_s=.041))[None]


def record(dry):
    """Antiresonance of the mount cancels a narrow band; hiss joins, and a low-pass limits the treble."""
    notch_hz, width_hz, depth_db, cutoff_hz = 165, 25, 13, 15800
    size = next_fast_len(N)
    detuning = (np.fft.rfftfreq(size, 1 / SR) - notch_hz) / (width_hz / 2)
    notch = amp(-depth_db / (1 + detuning ** 4))
    heard = irfft(rfft(dry, size) * notch, size)[:, :N]
    low_pass = signal.firwin(511, cutoff_hz, window=("kaiser", 9), fs=SR)
    return signal.oaconvolve(heard + hiss(), low_pass[None], "same")


dry = scene()
out = record(dry)
wrap_up_sound(out)
```